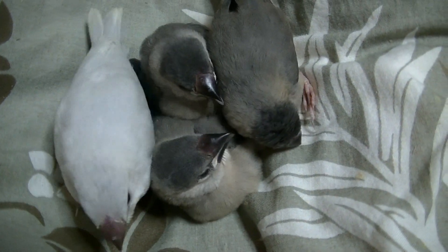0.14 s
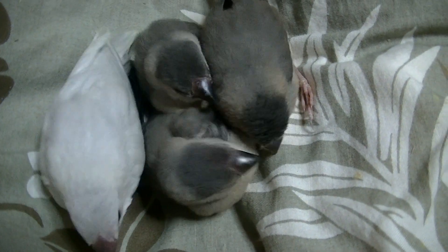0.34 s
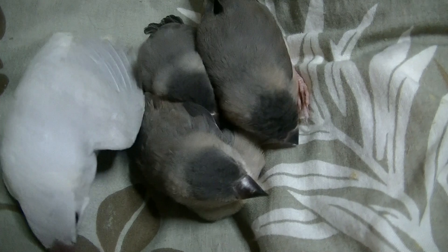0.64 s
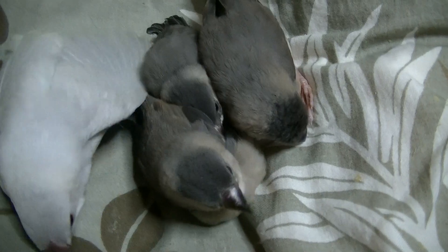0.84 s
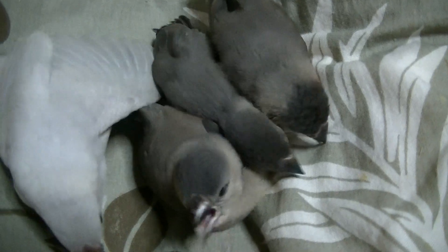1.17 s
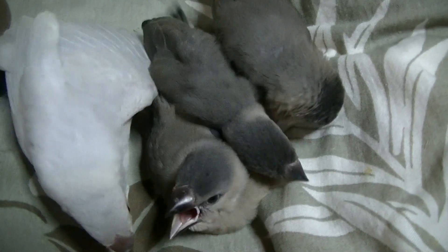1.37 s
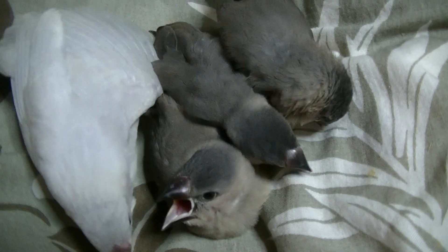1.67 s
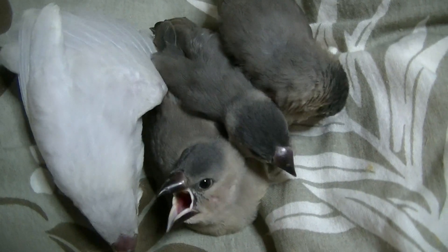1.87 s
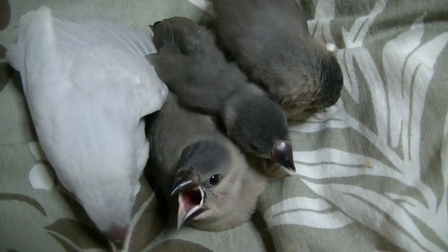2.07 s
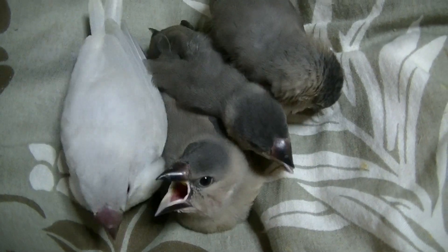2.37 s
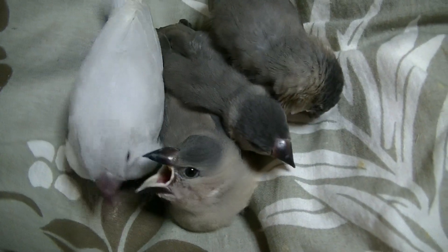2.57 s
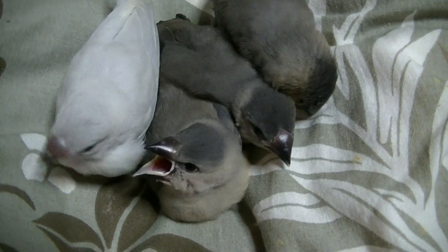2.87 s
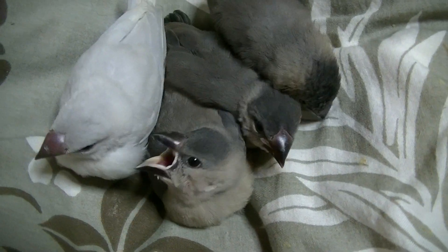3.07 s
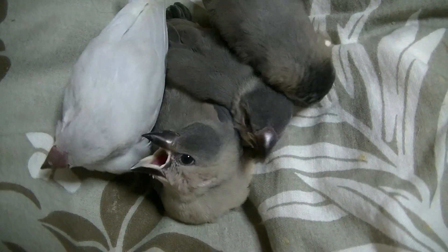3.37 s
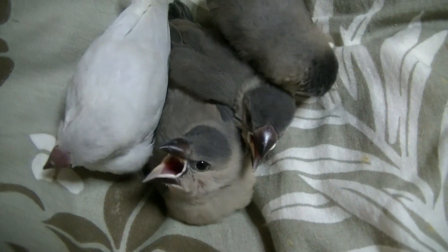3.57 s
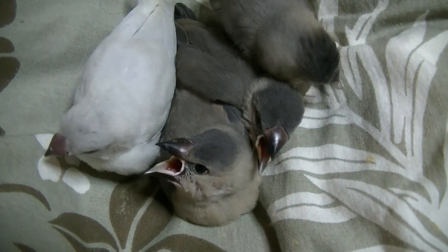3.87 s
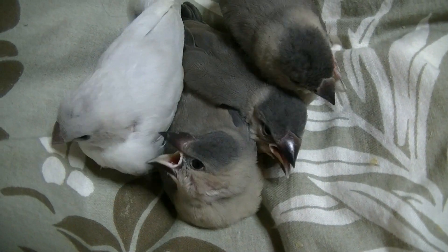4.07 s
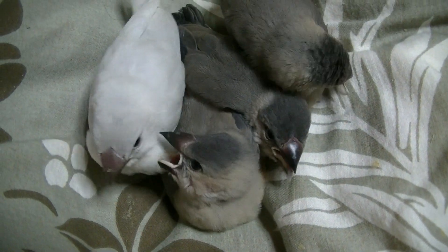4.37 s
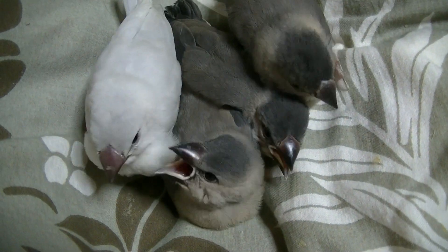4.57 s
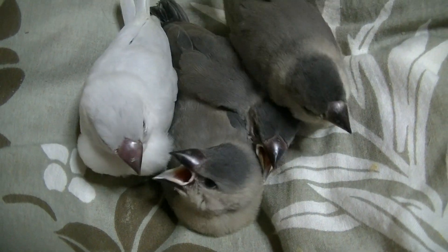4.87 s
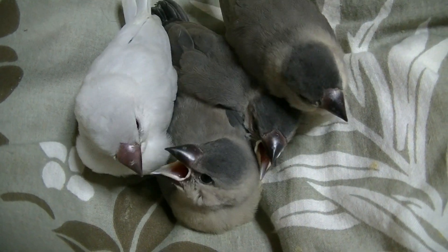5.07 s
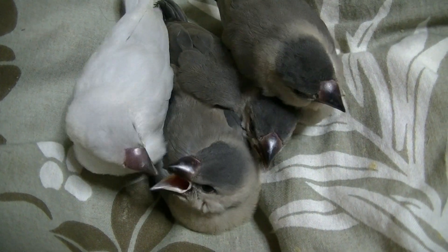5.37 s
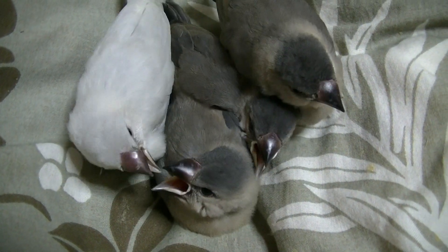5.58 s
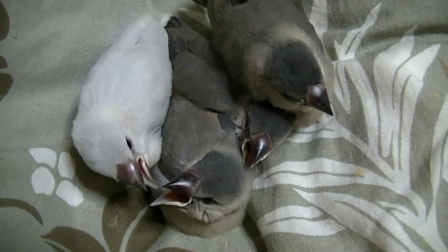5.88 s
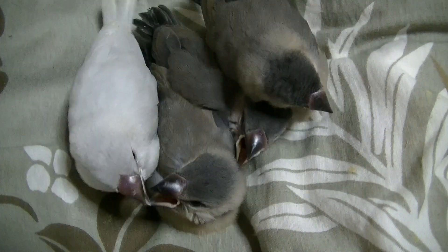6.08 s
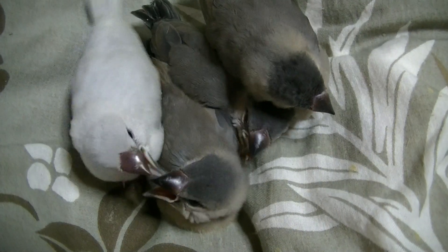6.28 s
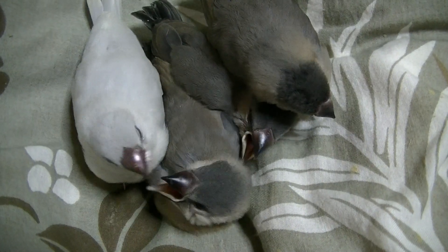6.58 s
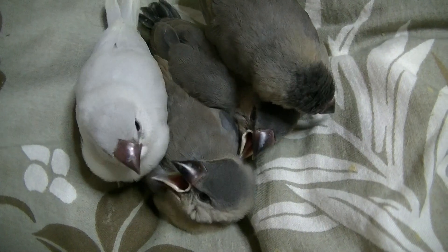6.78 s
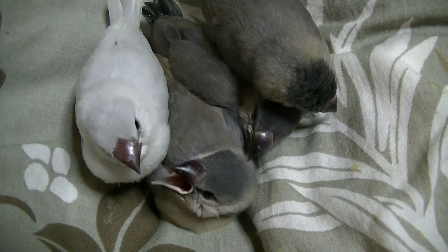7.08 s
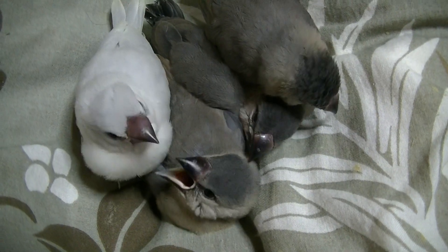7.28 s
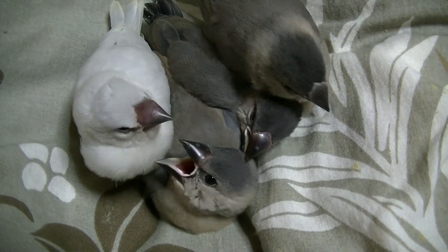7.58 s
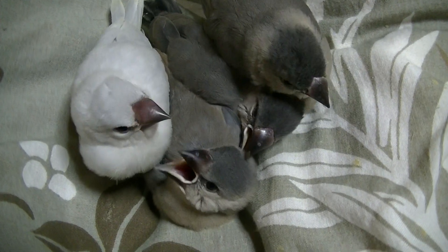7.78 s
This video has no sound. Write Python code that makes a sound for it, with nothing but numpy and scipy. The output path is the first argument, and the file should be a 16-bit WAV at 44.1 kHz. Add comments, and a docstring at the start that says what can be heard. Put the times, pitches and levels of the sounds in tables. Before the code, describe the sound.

A small, still room, heard very close up in narrow stereo. From 0 to 0.9 s, young finches give a few loud, separated cheeps while claws shuffle on cloth and a wing brushes past; tiny beak clicks fall near 0.3 s. From about 0.95 s the begging becomes a steady, urgent stream, six or seven calls a second, often overlapping. Each lasts well under a tenth of a second: a raspy start jumps to a piercing whistle near 2.6 kHz, then crumbles into two rough, buzzy pulses. Longer, slightly higher calls weave in, with occasional hoarse ones near 2.5, 5.4 and 6.1-6.4 s. Soft wing swishes come at 2.25 and, more clearly, 3.1-3.3 s; a beak clicks around 1.7 and 6.7 s. Faint chirps dot the background. After 6.6 s the cheeps thin a little, still harsh, continuing to the end at about 8 s with a short bright echo.

```python
"""Small room: three finch chicks beg on a cloth, close under the microphone; other birds chirp far off.
Each cheep is three arches of syrinx tension: the slack membranes rattle, lock into a whistle at the
first crest, then roughen through the later arches. Throat resonances colour it. Feet and wings rustle
as flickering coloured noise, footfalls and far notes are gliding sines, beaks click, the room echoes."""
import sys
import numpy as np
from scipy import signal
from scipy.fft import rfft, irfft, next_fast_len
from scipy.io import wavfile
from scipy.ndimage import uniform_filter1d

SR = 44100
rng = np.random.default_rng(int(sys.argv[2]) if len(sys.argv) > 2 else 0)


def store_pcm(level_fs):
    """Save levels as 16-bit WAV."""
    pcm = np.round(np.clip(level_fs, -1, 1) * 32767).astype(np.int16)
    wavfile.write(sys.argv[1], SR, np.atleast_2d(pcm).T)


N = 349713

# still air, spectrum: (frequency [Hz], gain [dB])
AIR_COLOUR = [(30, 12), (100, -8), (200, -16), (450, 2), (1500, 0), (3200, 13), (5300, -23), (8000, -41),
              (16000, -33)]
AIR_DB = -50
# echo spectrum: (frequency [Hz], gain [dB])
ECHO_COLOUR = [(300, -6.5), (1000, -7.5), (2000, 6.5), (3400, 1.5), (4500, 5), (5350, 0), (6300, 1),
               (8000, -5), (15000, -12)]
# far birds: (start [s], length [s], start pitch [Hz], end pitch [Hz], level [dB])
FAR_CHIRPS = [(.27, 0.047, 3720, 3680, -40.5), (.54, 0.26, 3600, 3660, -47), (.58, 0.14, 1940, 2050, -49),
              (.84, .1, 4200, 4000, -45), (1.02, 0.13, 4000, 3940, -43), (1.15, 0.14, 2080, 2120, -46.5),
              (1.31, 0.11, 4420, 4350, -44), (1.82, 0.023, 4150, 4050, -39), (2.05, 0.041, 3700, 3840, -35),
              (2.53, 0.043, 3920, 3840, -45), (3.54, .12, 3330, 3130, -35.5),
              (4.61, 0.07, 2870, 3030, -31.5), (4.64, 0.067, 3500, 3760, -36),
              (4.93, 0.051, 3400, 3450, -37), (6.67, 0.084, 3040, 3100, -36.5),
              (7.11, 0.066, 3200, 3180, -39.5), (7.65, 0.097, 2880, 2800, -39)]
# faint low tones in the room: (start [s], length [s], start pitch [Hz], end pitch [Hz], level [dB])
LOW_TONES = [(2.04, 0.097, 518, 470, -53), (2.11, 0.11, 451, 392, -46), (3.2, 0.06, 422, 384, -52.5),
             (4.3, 0.043, 477.6, 480, -56.5), (6.14, 0.083, 496, 496, -53.5), (6.48, 0.11, 496, 482, -51)]
# soft bumps of feet on cloth: (start [s], length [s], start pitch [Hz], end pitch [Hz], level [dB])
FOOTFALLS = [(1.21, 0.06, 542, 546, -46), (1.34, 0.095, 477, 425, -58), (2.29, 0.083, 257, 250, -61),
             (2.57, 0.043, 470, 470, -49), (2.86, 0.051, 440, 480, -55.5), (3.19, 0.078, 345, 332, -56)]
# feet shuffle, then settle: (time [s], level [dB])
SHUFFLE = [(0, -38.5), (.75, -41), (1.3, -44.5), (1.7, -50), (2.3, -47.5), (2.7, -52), (7.9, -52)]
# wings brush past: (middle [s], length [s], level [dB])
WING_SWISHES = [(0.03, .12, -39), (0.628, 0.086, -36.5), (2.253, 0.38, -36.5), (3.116, 0.16, -27),
                (3.278, .17, -28.5), (3.964, 0.35, -43)]
# rustle spectra, cloth and wings: (frequency [Hz], gain [dB])
CLOTH_COLOUR = [(120, -67), (200, -19), (1500, -2.5), (1870, -5.5), (3690, -4.5), (5130, -9), (5630, -8.5),
                (16000, -21)]
WING_COLOUR = [(200, -37), (1000, -17), (3500, -2), (6000, -1), (9500, -11), (16000, -35)]
# beaks click as they part: (time [s], peak [dB])
BEAK_TICKS = [(.176, -40), (0.294, -20), (.422, -25), (1.667, -18), (6.732, -17), (7.77, -25)]

# cheeps of each kind: (crest [s], crest pitch [Hz], level [dB], length factor [1])
SHORT_CHEEPS = [(.1435, 2594, -9.5, 0.69), (.9445, 2584, -9.5, 0.69), (1.1005, 2515, -10, 0.91),
                (1.265, 2483, -9.5, 0.88), (1.413, 2560, -10.5, 1), (1.561, 2550, -8.5, 1),
                (1.736, 2543, -14, 0.99), (1.9085, 2610, -10, .97), (2.1005, 2570, -9, 0.9),
                (2.2665, 2550, -9.5, 0.96), (2.4195, 2630, -17, 0.99), (2.6145, 2580, -7.5, 0.99),
                (2.7785, 2670, -7.5, .96), (2.9455, 2570, -8, 0.96), (3.146, 2690, -9.5, 1),
                (3.308, 2717, -8, 1), (3.4645, 2594, -7, 0.94), (3.692, 2637, -8, 0.97),
                (3.865, 2688, -12.5, 0.94), (4.0715, 2668, -8.5, 0.98), (4.211, 2695, -9.5, 0.96),
                (4.384, 2706, -8, 1), (4.546, 2648, -6.5, 0.97), (4.726, 2682, -6.5, 0.92),
                (4.8995, 2590, -9.5, 1), (5.064, 2678, -8.5, 0.98), (5.239, 2626, -9, 1),
                (5.4335, 2658, -9.5, 0.99), (5.577, 2655, -10.5, 1), (5.7675, 2618, -10.5, 1),
                (5.9545, 2678, -8.5, .95), (6.082, 2583, -10.5, 0.97), (6.242, 2635, -9, 1),
                (6.4115, 2616, -10.5, 0.93), (6.6225, 2610, -7, 0.91), (6.9915, 2709, -8.5, 0.91),
                (7.204, 2646, -8.5, 0.85), (7.3945, 2639, -9.5, 0.95), (7.6265, 2630, -8.5, .94)]
LONG_CHEEPS = [(.205, 2800, -7.5, 0.89), (.451, 2733, -9.5, 0.94), (.7375, 2850, -9.5, 0.87),
               (1.698, 2878, -10.5, 0.96), (1.9735, 2852, -11.5, 1), (2.392, 2923, -10.5, 0.95),
               (2.972, 2883, -13, 0.96), (3.5105, 2910, -11, 0.97), (3.869, 2792, -11.5, 1),
               (4.4465, 2840, -10.5, 0.89), (4.775, 2876, -11, 1), (5.0955, 2941, -12, 1),
               (5.584, 2932, -14, 1), (5.785, 2800, -13, 1), (6.093, 2944, -14.5, 1),
               (6.4855, 2910, -10.5, 0.97), (6.762, 2856, -10, 1), (7.426, 2862, -11, 0.88),
               (7.8015, 2943, -9, 0.94)]
HOARSE_CHEEPS = [(2.4755, 2472, -13, 0.99), (5.372, 2654, -11.5, 1.24), (6.131, 2387, -13, 1.1),
                 (6.364, 2664, -9.5, 0.96)]
# arches of tension: (time from crest [s], rise [s], fall [s], height [0-1], level [dB]);
# the length factor stretches their times
SHORT_ARCHES = [(0, .0092, .0082, 0.99, -0.5), (0.0192, .006, .0065, 0.73, -5), (.033, .004, .005, 0.6, -9)]
LONG_ARCHES = [(0, .0165, .0098, 1, 1.5), (.0225, .007, .007, .8, 3.5), (.038, .005, .006, .58, -2.5)]
HOARSE_ARCHES = [(0, .0075, .006, 0.95, -2.5), (0.0156, .0045, .0045, 0.85, -1.5),
                 (.029, .005, .005, .68, -4)]
# kinds of cheep: airflow onset_s, attack_s, end_s [s, onset and end from crest, stretched likewise];
# blunt [2 = bell, more = flatter arch]; lock [tension where membranes lock]; least_rough [0-1];
# sag_db [dB lost per unit of tension between arches]; rattle_low_db [change of the rattle's lows, dB]
SHORT_VOICE = dict(onset_s=-0.019, attack_s=.0065, end_s=0.04075, blunt=2.1, lock=.93, least_rough=0.07, sag_db=20, rattle_low_db=1.5)
LONG_VOICE = dict(onset_s=-.027, attack_s=0.0099, end_s=0.053, blunt=2.6, lock=.87, least_rough=.04, sag_db=23, rattle_low_db=1.5)
HOARSE_VOICE = dict(onset_s=-.0115, attack_s=0.0052, end_s=0.041, blunt=2.2, lock=0.93, least_rough=0.13, sag_db=9.5, rattle_low_db=-2.5)
# colour as the head turns: (time [s], treble level [dB], level of low partials [dB])
SHORT_COLOUR = [(.14, -8.5, 2.5), (1.1, 9.5, 1), (1.5, 9.5, -1.5), (2.4, 5, 0), (2.8, -2.5, -3),
                (4.2, -4.5, -1), (4.7, -2, -2), (6.3, -0.5, -0.5), (7.6, -6, -1.5)]
LONG_COLOUR = [(.2, -13.5, -4.5), (.74, -9.5, 2), (1.7, -0.5, 0), (3, -4, -1), (4.8, -0.5, -1),
               (6.5, -5.5, -2.5), (7.8, -9, -2)]
HOARSE_COLOUR = [(2.5, 0.98, 13.6), (5.4, .5, 6.5), (6.4, 1, 6)]
# locked syrinx, harmonics 1-6: (level [dB])
WHISTLE_DB = [-3.5, 1.5, -2, -4, -3, -4.5]
# windpipe and open beak: (frequency [Hz], gain [dB])
THROAT = [(150, -56), (500, -30), (750, -23.5), (1100, -12.5), (1900, -12.5), (2900, -5.5), (3800, -13),
          (4700, -4), (5700, 1), (6600, -6), (7900, -12.5), (10400, -10.5), (13500, -23), (16000, -28)]
# port difference: (frequency [Hz], left minus right [dB])
PORT_BALANCE = [(500, 3.8), (1000, 1), (2000, -0.9), (5000, -1), (8000, 1.7), (12000, -3)]

RELEASE_S = 0.0083   # airflow ramps to zero; stretched by the length factor
CUT_SHORT_DB = 44.5   # loss at the end of a shortened cheep, per unit of length factor
SLACK = .28   # resting tension
LOCK_RANGE, LOCK_LAG_S = .44, .0012   # tension span from whistle to full rattle, and its delay
SCOOP_LEAD_S, SCOOP_WIDTH_S, SCOOP_HEIGHT, SCOOP_DB = .003, .0035, .56, -24.5   # soft, before onset
AFTER_SHIFT_S, AFTER_HEIGHT_SPREAD, AFTER_SPREAD_DB = 0.001, .07, 1   # chance in later arches
PORT_LEAD_S = 8e-6   # left port leads
LIMIT_DB, LIMIT_S = -9.0, 0.0033   # rms ceiling, time constant
CUTOFF_HZ = 16200


def from_db(db):
    """Amplitude ratio of a level in dB."""
    return 10 ** (np.asarray(db) / 20)


def rms_one(x):
    """Scale to an overall rms of 1."""
    return x / np.sqrt(np.mean(x ** 2) + 1e-20)


def at_hz(points, hz):
    """Read a spectrum on a log-frequency axis."""
    knots_hz, values = np.transpose(points)
    return np.interp(np.log(hz + 1), np.log(knots_hz), values)


def coloured(x, points):
    """Give a long signal a smooth spectrum."""
    size = next_fast_len(N)
    gain = from_db(at_hz(points, np.fft.rfftfreq(size, 1 / SR)))
    return irfft(rfft(x, size) * gain, size)[..., :N]


def resonate(x, gain_db):
    """Minimum-phase filter: it rings only after each pulse."""
    cepstrum = irfft(np.log(from_db(gain_db)))
    cepstrum[1:len(x) // 2] *= 2
    cepstrum[len(x) // 2 + 1:] = 0
    return irfft(rfft(x) * np.exp(rfft(cepstrum)))


def wander(t, per_s):
    """Chance drawn per_s times a second, joined by straight lines; spread near 1."""
    knots = np.linspace(t[0], t[-1], int((t[-1] - t[0]) * per_s) + 2)
    return np.interp(t, knots, rng.standard_normal(len(knots)))


def evened(x, span_s=0.0041):
    """Hold the running rms near 1."""
    width = max(int(span_s * SR), 8)
    power = uniform_filter1d(uniform_filter1d(x * x, width), width)
    return x / np.sqrt(np.abs(power) + 1e-12)


def bell(t, width_s, blunt=2):
    """Smooth hump of height 1 at t = 0."""
    return np.exp(-.5 * np.abs(t / width_s) ** blunt)


def turns(hz):
    """Phase [rad] of a varying frequency."""
    return 2 * np.pi * np.cumsum(hz) / SR


def add(out, start_s, x):
    """Mix x in at a time."""
    i = round(start_s * SR)
    out[i:i + len(x)] += x[:max(N - i, 0)]


def stereo_noise(side_db):
    """Noise mostly alike at two close microphone ports."""
    mid, side = rng.standard_normal((2, N))
    return mid + from_db(side_db) * side * [[1], [-1]]


def still_air():
    """Steady coloured noise of the room's air."""
    return from_db(AIR_DB) * rms_one(coloured(stereo_noise(side_db=-7.5), AIR_COLOUR))


def room(x, t60_s=0.25, wet_db=-21, side_db=-6, ring_db=-5.0):
    """Dense wall echoes, a few milliseconds late; one narrow band is raised and rings."""
    t = np.arange(N) / SR
    decay = from_db(-60 * t / t60_s) * np.clip(t / 0.014 - .5, 0, 1)
    tail = (stereo_noise(side_db) * decay)[:, :SR * 3 // 4]
    tail = tail / np.sqrt(np.sum(tail[0] ** 2))
    echoes = coloured(signal.fftconvolve(x[None], tail, axes=1)[:, :N], ECHO_COLOUR)
    ring = signal.lfilter(*signal.iirpeak(5290, 26, fs=SR), echoes)
    return from_db(wet_db) * (echoes + from_db(ring_db) * ring)


def far_notes(rows, waver):
    """Soft gliding sines; a strong pitch waver blurs one into a dull bump."""
    out = np.zeros(N)
    for start_s, length_s, from_hz, to_hz, level_db in rows:
        t = np.arange(int(length_s * SR)) / SR
        pitch_hz = np.linspace(from_hz, to_hz, len(t)) * (1 + waver * wander(t, 600))
        swell = signal.windows.tukey(len(t), .6) * from_db(level_db + 4.4 * wander(t, 120))
        add(out, start_s, np.sqrt(2) * swell * np.sin(turns(pitch_hz)))
    return out


def grains(t, grain_db, flutter_db):
    """Catch and slip: noise whose level flickers fast, in slower clumps."""
    noise = stereo_noise(side_db=-6.5)
    return noise * from_db(grain_db * wander(t, 900) + flutter_db * wander(t, 44))


def rustle(grain_db=2.5, flutter_db=1.4):
    """Claws drag on cloth; feather barbs catch and slip as wings brush past."""
    t = np.arange(N) / SR
    feet = from_db(np.interp(t, *np.transpose(SHUFFLE)))
    wings = sum(from_db(db) * bell(t - s, length_s / 4) for s, length_s, db in WING_SWISHES)
    cloth_noise = rms_one(coloured(grains(t, grain_db, flutter_db), CLOTH_COLOUR))
    wing_noise = rms_one(coloured(grains(t, grain_db, flutter_db), WING_COLOUR))
    return feet * cloth_noise + wings * wing_noise


def beak_ticks(size=1024):
    """Each click is an impulse that rings briefly in the mouth."""
    out = np.zeros(N)
    tick = resonate(signal.unit_impulse(size), at_hz(THROAT, np.fft.rfftfreq(size, 1 / SR)))
    for s, peak_db in BEAK_TICKS:
        add(out, s, from_db(peak_db) * tick / np.abs(tick).max())
    return out


def rattle(pitch_hz, jitter=.14, uneven_db=3.0, hiss=0.032):
    """Slack membranes slap at uneven intervals and strengths, over a hiss of air."""
    size = len(pitch_hz)
    cycles = np.cumsum(pitch_hz) / SR
    slaps = np.cumsum(np.exp(jitter * rng.standard_normal(size // 8)))
    at = np.searchsorted(cycles, slaps[slaps < cycles[-1]])
    pulses = np.zeros(size)
    pulses[at] = -from_db(uneven_db * rng.standard_normal(size)[:len(at)])
    return pulses + hiss * rng.standard_normal(size)


def varied(arches):
    """Keep the first arch; shift later ones by chance in time, height and level."""
    first, *later = arches
    out = [first]
    chances = rng.standard_normal((len(later), 3))
    for (s, rise_s, fall_s, height, db), (shift, high, loud) in zip(later, chances):
        new_height = min(height * (1 + AFTER_HEIGHT_SPREAD * high), 1)
        out.append((s + AFTER_SHIFT_S * shift, rise_s, fall_s, new_height, db + AFTER_SPREAD_DB * loud))
    return out


def gesture(t, arches, voice, length):
    """Tension, roughness and air pressure [dB]: quick attack, sags between arches, release."""
    t = t / length
    crests_s, _, _, heights, levels_db = np.transpose(arches)
    scoop = bell(t - voice["onset_s"] + SCOOP_LEAD_S, SCOOP_WIDTH_S)
    humps = [height * bell(t - s, np.where(t < s, rise_s, fall_s), voice["blunt"])
             for s, rise_s, fall_s, height, _ in arches]
    tension = np.maximum(np.max(humps + [SCOOP_HEIGHT * scoop], axis=0), SLACK)
    late_tension = np.interp(t - LOCK_LAG_S, t, tension)
    rough = np.clip((voice["lock"] - late_tension) / LOCK_RANGE, voice["least_rough"], 1)
    attack = np.clip((t - voice["onset_s"]) / voice["attack_s"], 0, 1)
    release = np.clip((voice["end_s"] - t) / RELEASE_S, 0, 1)
    sag_db = voice["sag_db"] * (np.interp(t, crests_s, heights) - tension) * (t > 0)
    fade_db = CUT_SHORT_DB * max(1 - length, 0) * np.clip(t / voice["end_s"], 0, 1)
    flow = attack * release * from_db(np.interp(t, crests_s, levels_db) - sag_db - fade_db)
    pressure = flow + from_db(SCOOP_DB) * scoop ** 2
    return tension, rough, 20 * np.log10(pressure + 1e-9)


def cheep(row, arches, voice, treble_db, low_db,
          second_side_hz=1250, coupling=0.44, collide_db=-27, size=6144):
    """One call, crest 50 ms in: tension sets the pitch and turns rattle into whistle and back."""
    _, crest_hz, level_db, length = row
    t = np.arange(size) / SR - 1 / 20
    arch, roughness, pressure_db = gesture(t, arches, voice, length)
    rough = np.clip(roughness * from_db(2.2 * wander(t, 200)), 0, 1)
    # slack membranes never take quite the same path
    stray = .14 * (1 - arch) * wander(t, 90)
    flicker = (0.0043 + .025 * rough) * wander(t, 700)
    pitch_hz = crest_hz * arch / arch.max() * (1 + stray + flicker)
    phase = turns(pitch_hz)
    whistle = sum(from_db(db) * np.cos(k * phase) * (k * pitch_hz < SR / 2)
                  for k, db in enumerate(WHISTLE_DB, 1))
    # the second side of the syrinx beats against the first, more when rough: sidebands
    beat_phase = turns(second_side_hz * from_db(2.4 * wander(t, 220)))
    whistle = whistle * (1 + 2 * coupling * rough * np.cos(beat_phase))
    # gape and turn of the head tilt the throat's spectrum
    hz = np.fft.rfftfreq(size, 1 / SR)
    lows = at_hz([(3000, 0.98), (4500, 0.031)], hz)
    highs = at_hz([(5500, 0.0047), (8300, 0.95), (11000, 0.69), (13500, 0.25)], hz)
    throat_db = at_hz(THROAT, hz) + low_db * lows + treble_db * highs
    clean = evened(resonate(-whistle, throat_db))
    harsh = evened(resonate(rattle(pitch_hz), throat_db + voice["rattle_low_db"] * lows))
    chaos = .75 * rough ** 2.5
    sound = np.sqrt(1 - chaos) * clean + np.sqrt(chaos) * harsh
    # on very little air the membranes do not collide: a pure tone opens and closes the call
    collide = np.clip((pressure_db - collide_db) / 10, 0, 1)
    sound = collide * sound + (1 - collide) * np.cos(phase)
    return sound * from_db(level_db + pressure_db + 1.27 * rough * wander(t, 300))


def chick(rows, arches, voice, colour, gain_db):
    """All calls of one bird, each coloured by the turn of its head."""
    out = np.zeros(N)
    times_s, treble_db, low_db = np.transpose(colour)
    for row in rows:
        crest_s = row[0]
        treble_now_db = np.interp(crest_s, times_s, treble_db)
        low_now_db = np.interp(crest_s, times_s, low_db)
        add(out, crest_s - 1 / 20, cheep(row, varied(arches), voice, treble_now_db, low_now_db))
    return from_db(gain_db) * out


def ports(x):
    """Two ports hear close sound with slightly different colour and delay."""
    size = next_fast_len(N)
    hz = np.fft.rfftfreq(size, 1 / SR)
    half = from_db(at_hz(PORT_BALANCE, hz) / 2) * np.exp(1j * np.pi * hz * PORT_LEAD_S)
    return irfft(rfft(x, size) * np.array([half, 1 / half]), size)[:, :N]


def scene():
    """Three close chicks, far notes mostly through the room, rustle and still air."""
    chicks = (chick(SHORT_CHEEPS, SHORT_ARCHES, SHORT_VOICE, SHORT_COLOUR, gain_db=0.0)
              + chick(LONG_CHEEPS, LONG_ARCHES, LONG_VOICE, LONG_COLOUR, gain_db=-1.5)
              + chick(HOARSE_CHEEPS, HOARSE_ARCHES, HOARSE_VOICE, HOARSE_COLOUR, gain_db=0.5))
    close = chicks + beak_ticks()
    far = far_notes(FAR_CHIRPS, waver=.03)
    low = far_notes(LOW_TONES, waver=.02) + far_notes(FOOTFALLS, waver=0.21)
    direct = ports(close) + from_db(-2) * far + low
    echoes = room(close + from_db(18) * far + from_db(18.5) * low)
    return direct + echoes + rustle() + still_air()


def limited(x):
    """Fast rms limiter shared by both channels; the first milliseconds slip through."""
    keep = np.exp(-1 / (LIMIT_S * SR))
    level = np.sqrt(signal.lfilter([1 - keep], [1, -keep], np.mean(x ** 2, axis=0)))
    return x / np.maximum(level / from_db(LIMIT_DB), 1)


def record(dry):
    """Limit loud calls, round the sharpest peaks, thin the bass, cut the top."""
    rounded = 1.1 * np.tanh(limited(dry) / 1.1)
    thinned = signal.sosfilt(signal.butter(2, 160, "high", fs=SR, output="sos"), rounded)
    return signal.sosfilt(signal.ellip(10, .1, 70, CUTOFF_HZ, fs=SR, output="sos"), thinned)


dry = scene()
out = record(dry)
store_pcm(out)
```